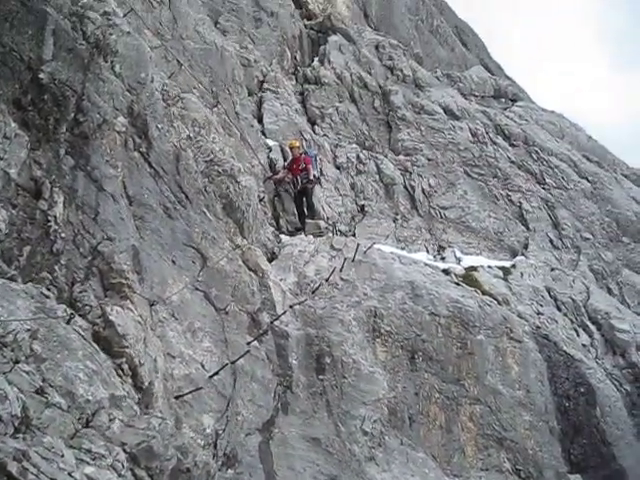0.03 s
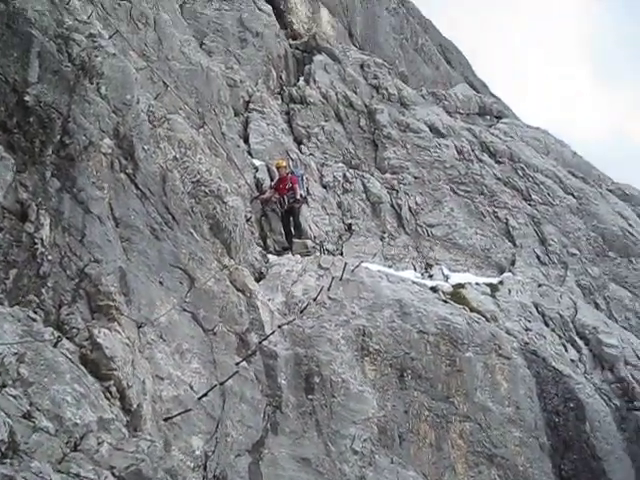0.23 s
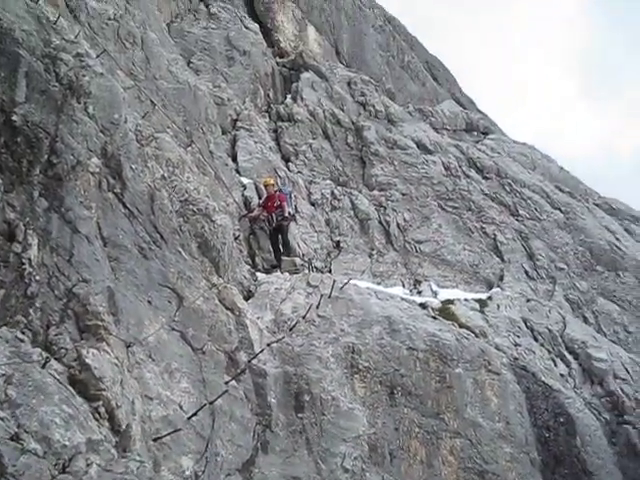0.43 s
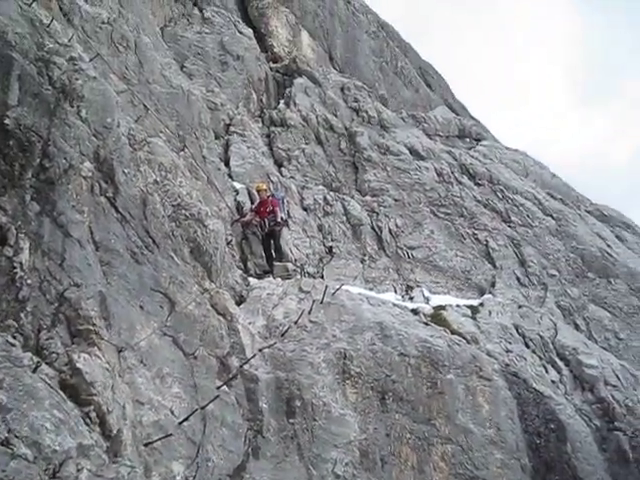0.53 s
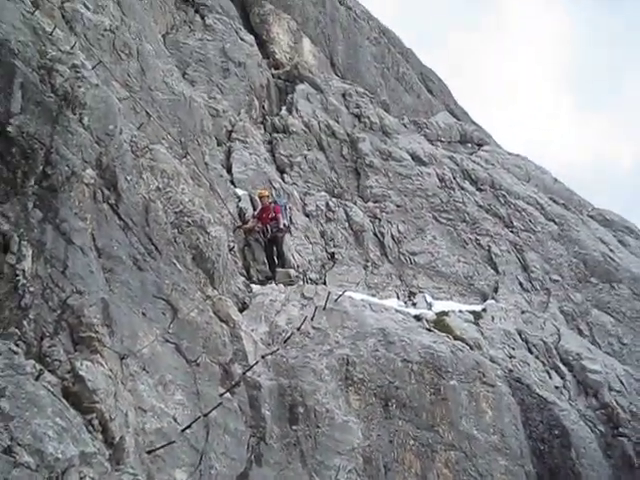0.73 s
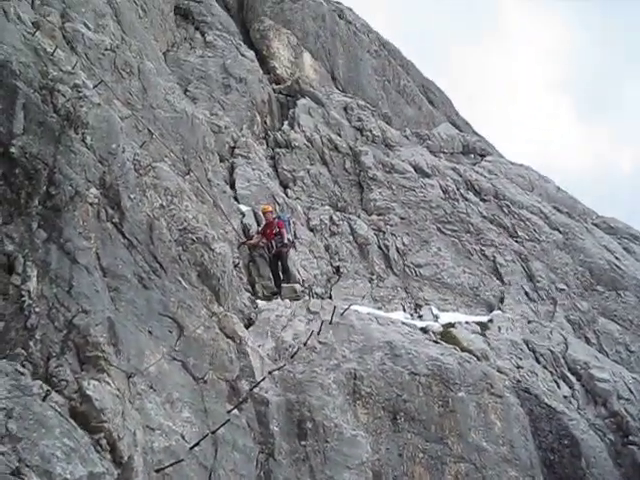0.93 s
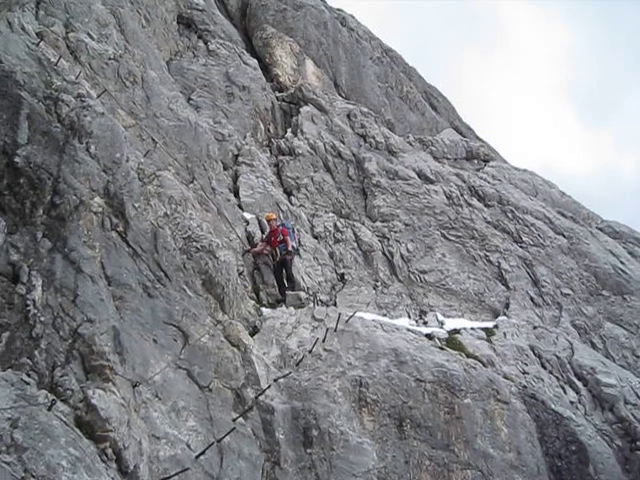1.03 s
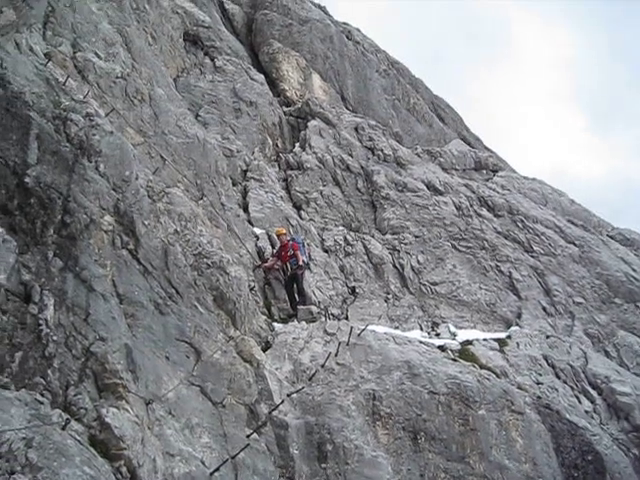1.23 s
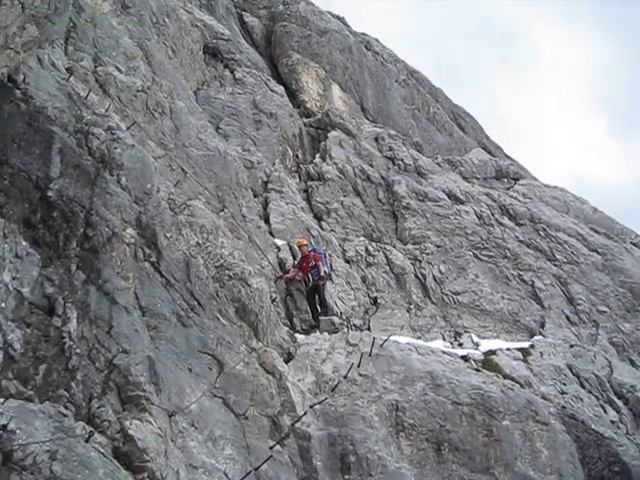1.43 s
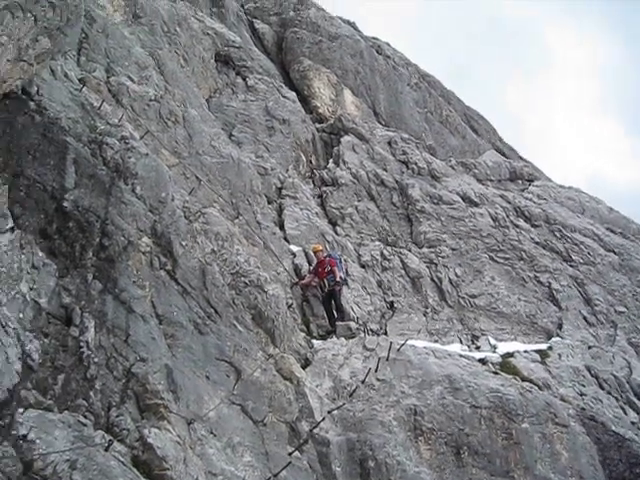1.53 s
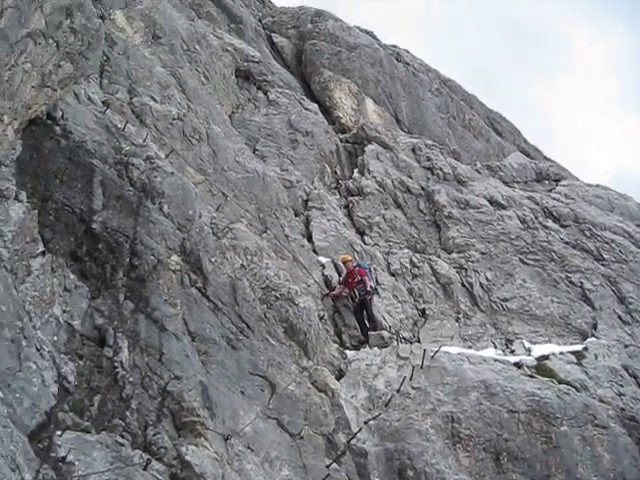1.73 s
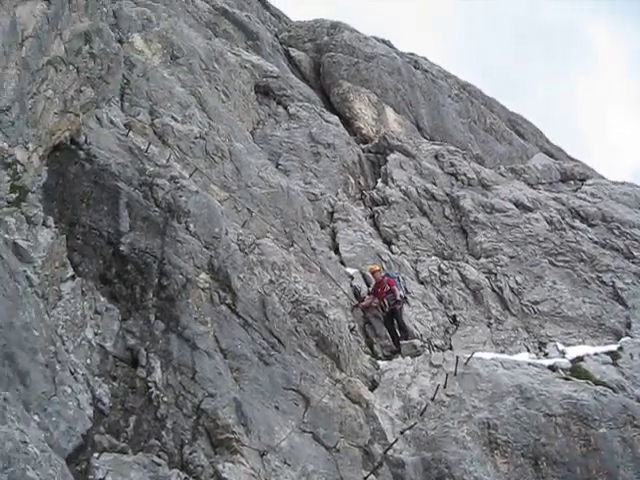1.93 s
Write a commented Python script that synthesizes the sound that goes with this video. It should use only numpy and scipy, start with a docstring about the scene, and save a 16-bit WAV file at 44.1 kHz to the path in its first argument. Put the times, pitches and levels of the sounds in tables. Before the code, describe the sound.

A small metal part, perhaps climbing gear, snaps shut close to the microphone with one sharp click and a faint ring. Two soft knocks and a few tiny scuffs follow, over light, steady wind on an open rock face.

```python
"""Open rock face: a steady wash of mountain air and a thin, uneven hiss throughout.
A soft handling knock and a tiny scuff come first. At 0.25 s a small metal part snaps home
close to the microphone: two contacts, one sharp click, a faint ring.
Two more soft knocks and a brief low hum follow, then a few tiny scuffs."""
import sys
import numpy as np
from scipy import signal
from scipy.fft import rfft, irfft
from scipy.io import wavfile
from scipy.ndimage import uniform_filter1d

SR = 44100
rng = np.random.default_rng(int(sys.argv[2]) if len(sys.argv) > 2 else 0)


def transcribe(u):
    """Save the signal u as a 16-bit wav file named by the first command-line argument.

    u: samples, shape (n,) or (channels, n), limited to [-1, 1]; the rate is SR.
    q: integer samples, one column per channel.
    """
    v = np.clip(np.atleast_2d(u).T, -1, 1)
    q = np.round(v * 32767).astype(np.int16)
    wavfile.write(sys.argv[1], SR, q)


N = 88200


def amp(db):
    """dB to gain."""
    return 10 ** (np.asarray(db) / 20)


def unit(x):
    """Scale to rms 1."""
    return x / np.sqrt(np.mean(x ** 2) + 1e-20)


def spectrum(points, hz):
    """Gain at hz from rows of f/Hz, level/dB; log-frequency interpolation."""
    f, db = np.transpose(points)
    return amp(np.interp(np.log(hz + 1), np.log(f + 1), db))


def level(points):
    """Gain over time from rows of t/s, level/dB."""
    return amp(np.interp(np.arange(N) / SR, *np.transpose(points)))


def since(start_s):
    """Seconds since start_s, zero before."""
    return np.maximum(np.arange(N) / SR - start_s, 0)


def noise(gain):
    """Noise of rms 1, spectrum shaped by gain(f/Hz)."""
    return unit(irfft(rfft(rng.standard_normal(N)) * gain(np.fft.rfftfreq(N, 1 / SR)), N))


def ring_envelope(t, rise_s, t60_s):
    """Exponential rise and decay of a struck resonance."""
    return (1 - np.exp(-t / rise_s)) * np.exp(-np.log(1000) * t / t60_s)


def burst(start_s, length_s, hz):
    """A few sine cycles under a Hann window."""
    t = since(start_s)
    return np.sin(np.pi * np.minimum(t / length_s, 1)) ** 2 * np.sin(2 * np.pi * hz * t)


def impulse(points, size=2048):
    """Minimum-phase click from rows of f/Hz, level/dB."""
    log_gain = np.log(spectrum(points, abs(np.fft.fftfreq(size, 1 / SR))))
    return np.fft.ifft(np.exp(np.conj(signal.hilbert(log_gain)))).real


def air():
    """Light wind: broad wash with drifting spectral patches and a slow swell."""
    # wind spectrum: f/Hz, relative density/dB
    colour = [(15, -26), (28, -4), (60, -2), (95, 2.5), (180, 0.5), (300, -1.5), (700, -3.5), (1150, -2),
              (1600, -2), (2800, -2.5), (3700, -6), (4400, -10.5), (5700, -15), (7000, -21), (8500, -47),
              (16000, -39)]
    # slow swell: t/s, gain/dB
    swell = [(0, 1.5), (.65, 1), (.9, -0.7), (1.2, 0.5), (1.6, -0.23), (2, 0.64)]
    level_db, patch_db = -47.5, 0.97
    bins = signal.stft(noise(lambda f: spectrum(colour, f)), nperseg=1024)[2]
    patches = uniform_filter1d(rng.standard_normal(bins.shape), size=14, axis=0)  # over frequency
    patches = unit(uniform_filter1d(patches, size=8, axis=1))  # over time
    wash = signal.istft(bins * amp(patch_db * patches))[1][:N]
    return amp(level_db) * level(swell) * unit(wash)


def hiss():
    """Thin treble hiss that swells and flickers."""
    # hiss spectrum: f/Hz, relative density/dB
    colour = [(2000, -25), (6000, -1.5), (9000, 2.5), (12000, 1), (14000, 1.5), (16000, -2.5)]
    # hiss envelope: t/s, level/dB
    envelope = [(0, -55), (.15, -58.5), (.27, -63), (.52, -63.5), (.63, -60), (.69, -62.5), (.74, -60.5),
                (.82, -63.5), (2, -63.5)]
    flicker_db = 0.7
    flicker = amp(flicker_db * unit(uniform_filter1d(rng.standard_normal(N), size=400)))
    return level(envelope) * flicker * noise(lambda f: spectrum(colour, f))


def knocks():
    """Soft handling knocks: a rough, quickly damped resonance with a weaker one below."""
    # knocks: t/s, level/dB, f/Hz, t60/s
    hits = [(0.078, -35, 426, 0.011), (0.3554, -29.5, 1150, 0.013), (0.4057, -27.5, 1690, 0.021)]
    rise_s, roughness = 0.0004, 0.3
    undertone_ratio, undertone_db = 0.76, -6
    out = np.zeros(N)
    for start_s, db, hz, t60_s in hits:
        t = since(start_s)
        grit = noise(lambda f: 1 / (1 + (f / hz - 1) ** 2 * 20))
        phase = 2 * np.pi * hz * t
        tone = np.sin(phase) + amp(undertone_db) * np.sin(undertone_ratio * phase)
        out += amp(db) * ring_envelope(t, rise_s, t60_s) * (tone + roughness * grit)
    return out


def scuffs():
    """Tiny bright scuffs, as of clothing: noise puffs that rise fast and fade."""
    # scuffs: t/s, level/dB, centre f/Hz, rise/s
    puffs = [(.137, -55, 13000, .004), (.719, -54.5, 12500, 0.0027), (.782, -58, 12000, 0.0016),
             (0.915, -55, 13000, 0.0018), (.923, -55, 5570, .005), (1.297, -58, 10400, 0.0025),
             (1.452, -59, 13500, .016), (1.712, -61, 13000, 0.0091)]
    relative_width = 0.32
    out = np.zeros(N)
    for start_s, db, hz, rise_s in puffs:
        age = since(start_s) / rise_s
        band = noise(lambda f: 1 / (1 + ((f / hz - 1) / relative_width) ** 2))
        out += amp(db) * age * np.exp(1 - age) * band
    return out


def snap():
    """Metal part snaps home: two contacts with bright ticks; the second cracks and rings the metal."""
    # contacts: t/s, level/dB, f/Hz, length/s, tick level/dB, tick f/Hz
    contacts = [(.24694, -2, 3953, .00174, -19, 12200), (.24826, -6.7, 3955, .00135, -23, 10200)]
    # spectrum of the landing crack: f/Hz, relative level/dB
    crack_colour = [(100, -23), (500, 8), (1500, -12), (3000, -5), (6000, -7), (9000, 4), (13000, -17),
                    (16000, -6)]
    # modes of the part: f/Hz, level/dB, t60/s
    modes = [(1142, -22, 0.017), (1270, -31.5, 0.024), (1940, -16.5, 0.0068), (2180, -21, 0.0058),
             (3640, -17.5, 0.017), (5220, -18.5, 0.0082), (6785, -12, 0.0043), (3015, -30.5, 0.31),
             (3725, -33, 0.21), (3860, -33.5, 0.13), (4590, -45.5, 0.26)]
    tick_s, crack_db, ring_rise_s, highpass_hz = 0.00058, -9.5, 0.00024, 330
    out = np.zeros(N)
    for start_s, db, hz, length_s, tick_db, tick_hz in contacts:
        out += amp(db) * burst(start_s, length_s, hz)
        out += amp(tick_db) * burst(start_s + (length_s - tick_s) / 2, tick_s, tick_hz)
    landing_s = contacts[-1][0]
    onset = round(landing_s * SR)
    crack = amp(crack_db) * impulse(crack_colour)
    out[onset:onset + len(crack)] += crack
    t = since(landing_s)
    for hz, db, t60_s in modes:
        out += amp(db) * ring_envelope(t, ring_rise_s, t60_s) * np.sin(2 * np.pi * hz * t)
    return signal.sosfilt(signal.butter(2, highpass_hz, "high", fs=SR, output="sos"), out)


def hum():
    """Faint, wavering low hum: narrow-band noise that swells twice after the click."""
    # hum envelope: t/s, level/dB
    envelope = [(.22, -65), (.27, -63.5), (.35, -51.5), (.43, -63), (.49, -52.5), (.55, -88)]
    centre_hz, half_width_hz = 481, 43
    return level(envelope) * noise(lambda f: 1 / (1 + ((f - centre_hz) / half_width_hz) ** 2))


def scene():
    """Mono mix: the click and small noises over mountain air."""
    return (air() + hiss() + knocks() + scuffs() + snap() + hum())[None]


def record(dry):
    """Recorder: treble notch, steep band limit."""
    notch_hz, notch_q, cutoff_hz = 7890, 7.8, 15850
    notched = signal.lfilter(*signal.iirnotch(notch_hz, notch_q, SR), dry)
    lowpass = signal.firwin(511, cutoff_hz, window=("kaiser", 9), fs=SR)
    return signal.oaconvolve(notched, lowpass[None], "same")


dry = scene()
out = record(dry)
transcribe(out)
```